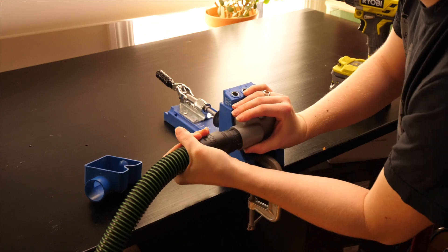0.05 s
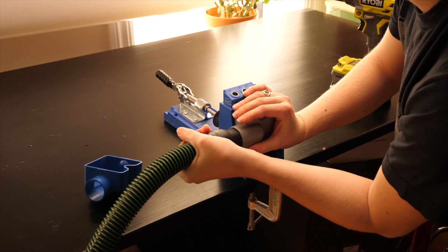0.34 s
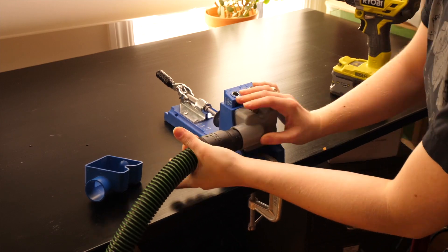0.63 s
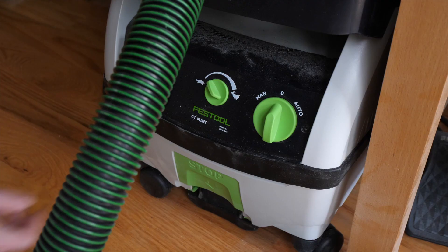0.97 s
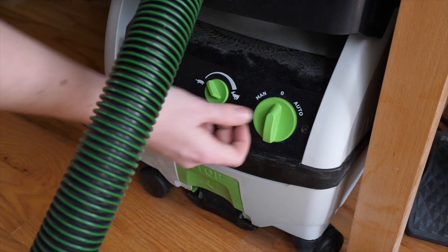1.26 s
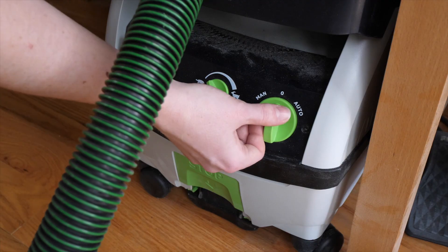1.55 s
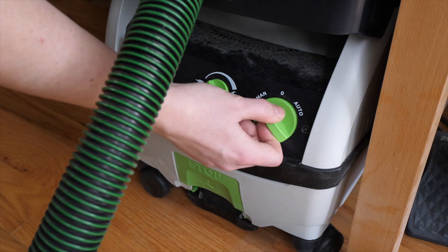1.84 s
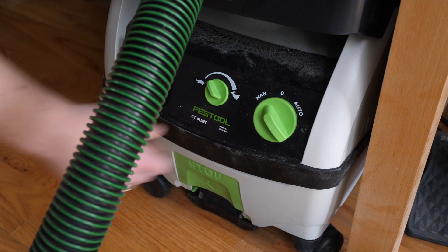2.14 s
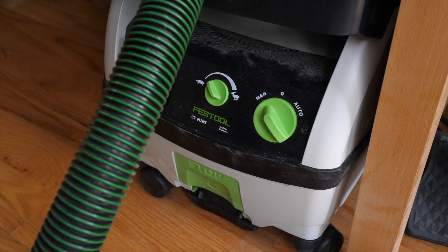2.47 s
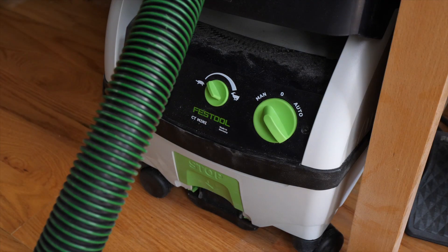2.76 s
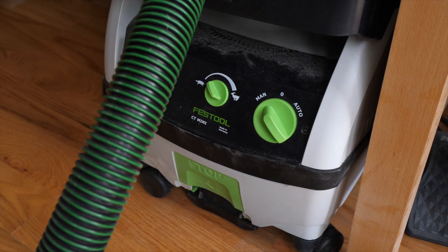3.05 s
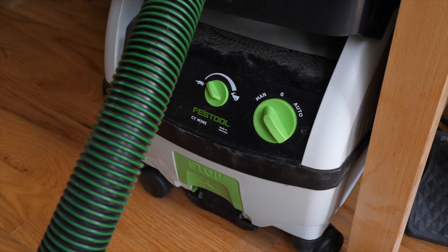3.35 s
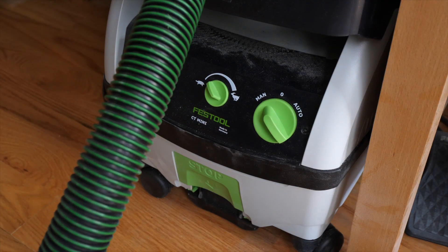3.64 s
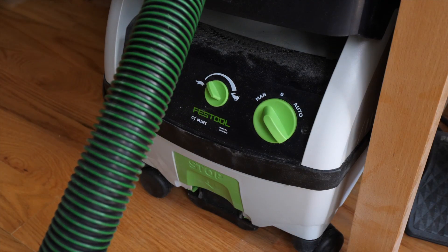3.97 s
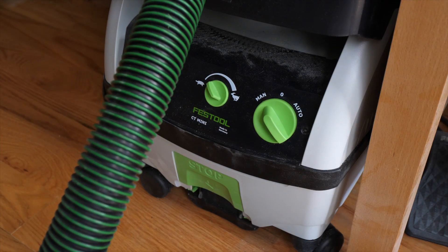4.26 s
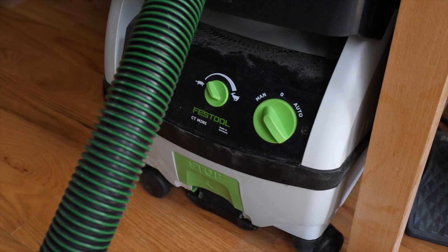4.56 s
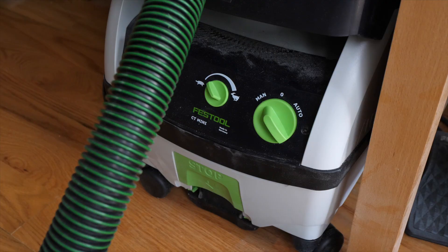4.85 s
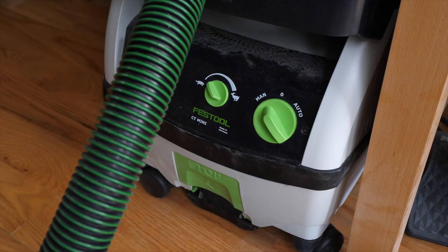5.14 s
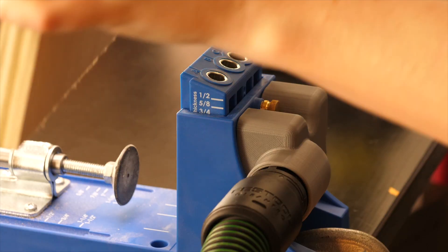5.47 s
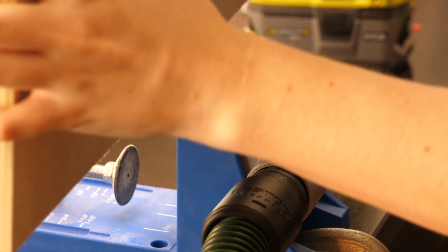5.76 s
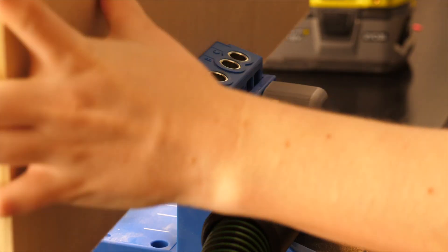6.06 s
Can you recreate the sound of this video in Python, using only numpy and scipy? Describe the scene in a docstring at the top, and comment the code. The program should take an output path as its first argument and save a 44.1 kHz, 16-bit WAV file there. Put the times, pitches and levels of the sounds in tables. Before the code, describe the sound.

A dust extractor clicks on in a workshop and spins up to roaring airflow, then a board scrapes briefly over close hose hiss.

```python
"""A small workshop with a dust extractor, in mono. Over a low background, fingers touch
the rotary switch; it snaps on, ringing its plastic panel and rattling the housing.
The motor hums on the mains and whines up to speed with brief whistles; its fan builds a
steady roar of air. Near the end the suction hiss at the hose inlet comes close,
and a board slides in a jig with short squeaky scrapes."""
import sys
import numpy as np
from scipy import signal
from scipy.fft import rfft, irfft, next_fast_len
from scipy.io import wavfile
from scipy.ndimage import map_coordinates

SR = 44100
rng = np.random.default_rng(int(sys.argv[2]) if len(sys.argv) > 2 else 0)


def unload_audio(sound):
    """Save the sound as a 16-bit wav file, at the path given as the first command line argument."""
    columns = np.transpose(np.atleast_2d(sound))
    # keep every value between -1 and 1, then stretch to whole-number steps
    steps = np.round(np.clip(columns, -1, 1) * 32767)
    wavfile.write(sys.argv[1], SR, steps.astype(np.int16))


N = 278271
TIME = np.arange(N) / SR
HUM_HZ = 120.1  # twice the mains frequency
FULL_SPEED_RPS = 552.6


def amp(db):
    """Decibels to gain."""
    return 10 ** (np.asarray(db) / 20)

def unit(x):
    """x at rms 1."""
    return x / np.sqrt(np.mean(x ** 2) + 1e-20)

def along(points, hz):
    """Interpolates (Hz, value) points on a log frequency axis."""
    f, v = np.transpose(points)
    return np.interp(np.log(hz + 1), np.log(f + 1), v)

def bumps(resonances, hz):
    """Boost in dB from resonances and notches."""
    return sum(db / (1 + (2 * (hz - centre) / width) ** 2) for centre, width, db in resonances)

def wobble(rate_hz):
    """Smooth random curve."""
    return map_coordinates(rng.standard_normal(int(N * rate_hz / SR) + 4), [TIME * rate_hz])

def filtered(x, response):
    """x through a gain given as a function of Hz."""
    size = next_fast_len(N + SR // 2)
    return irfft(rfft(x, size) * response(np.fft.rfftfreq(size, 1 / SR)), size)[:N]

def noise(spectrum, resonances=()):
    """Shaped noise at rms 1."""
    white = rng.standard_normal(N)
    return unit(filtered(white, lambda hz: amp(along(spectrum, hz) + bumps(resonances, hz))))

def decay(start_s, t60_s):
    """Instant attack, exponential fall."""
    return (TIME >= start_s) * amp(-60 * np.clip((TIME - start_s) / t60_s, 0, 10))

def ramp(start_s, length_s):
    """Linear rise from 0 to 1."""
    return np.clip((TIME - start_s) / length_s, 0, 1)


# Each row: frequency in Hz, relative noise density in dB.
FLOOR_SPECTRUM = [(12, -33), (20, -1.5), (123, -7.5), (181, -21), (239, -14), (268, -23.5), (364, -23.5),
                  (442, -30.5), (691, -34), (840, -37.5), (913, -34), (1050, -39.5), (1140, -40),
                  (2490, -43), (15700, -46)]

def room_floor():
    """Low background with a faint mains hum."""
    mains = amp(-57.5) * np.sin(np.pi * HUM_HZ * TIME)
    overtone = amp(-67) * np.sin(4 * np.pi * HUM_HZ * TIME + .5 * wobble(5.77))
    return amp(-54) * noise(FLOOR_SPECTRUM) + mains + overtone


# Each row: frequency in Hz, reverberation t60 in seconds.
ROOM_DECAY = [(150, 0.39), (1000, 0.75), (3500, 0.5), (6000, .25), (14000, 0.12)]

def workshop(x, wet_db):
    """Adds the room's reverberation; treble dies first."""
    hz, t, bins = signal.stft(rng.standard_normal(SR // 2), SR, nperseg=256)
    tail = signal.istft(bins * amp(-60 * t / along(ROOM_DECAY, hz)[:, None]), SR, nperseg=256)[1]
    tail *= 1 - np.exp(-np.arange(len(tail)) / SR / .0043)
    return x + amp(wet_db) * signal.fftconvolve(x, tail / np.linalg.norm(tail))[:N]


# Each row: start in seconds, level in dB, centre in Hz, half width in octaves, t60 in seconds.
KNOB_TOUCHES = [(1.337, -57, 1500, 1.5, 0.073), (1.38, -54.5, 1070, 1.75, 0.21),
                (1.382, -66, 4930, .05, 0.28), (1.425, -67, 10950, .5, .12),
                (1.634, -50, 1620, 0.95, 0.059), (2.068, -51, 3980, .1, 0.079),
                (2.072, -60, 5000, 0.39, 0.11)]

def touches():
    """Fingers tap and brush the knob: short noise bursts."""
    out = np.zeros(N)
    for start_s, db, centre_hz, octaves, t60_s in KNOB_TOUCHES:
        band = lambda hz: 1 / (1 + (np.log2((hz + 1) / centre_hz) / octaves) ** 4)
        out += amp(db) * decay(start_s, t60_s) * unit(filtered(rng.standard_normal(N), band))
    return workshop(out, wet_db=-8.5)


# The switch slips its detent, hits its stop, rebounds.
# Each row: start in seconds, relative ring level in dB, crack level in dB.
SWITCH_CONTACTS = [(1.7925, -41, -32), (1.7961, -13.5, -18), (1.8007, -34, -27), (1.8049, -19.5, -43)]
# Each row: frequency in Hz, relative level in dB, t60 in seconds.
PANEL_MODES = [(522, -6.5, 0.05), (910, -22, .09), (1183, -5.5, 0.083), (1233, -13, 0.1), (1400, -4, 0.027),
               (1730, -9, 0.05), (1940, 0, 0.052), (2090, 4, 0.023), (2350, -1, 0.021), (2580, 0, 0.026),
               (2900, 0, .02), (3160, -3, .04), (3660, -10, 0.026)]
# Each row: frequency in Hz, relative noise density in dB.
CLATTER_SPECTRUM = [(100, -17), (350, -16.5), (550, -6.5), (850, -8.5), (1200, -4.5), (1500, -4),
                    (2000, -6), (2700, -9.5), (3400, -5.5), (4300, -16.5), (5500, -28), (9000, -38),
                    (15000, -55)]

def switch():
    """Contacts crack and ring the plastic panel; the main blow thrusts air and rattles the housing."""
    out = np.zeros(N)
    t = TIME[:SR // 4]
    crack_spectrum = [(100, -17), (2000, 2), (5000, 8), (7300, 5), (9000, -3), (15000, -1)]  # Hz, dB
    for start_s, ring_db, crack_db in SWITCH_CONTACTS:
        ring = sum(amp(db - 60 * t / t60_s) * np.sin(2 * np.pi * (hz * t + rng.random()))
                   for hz, db, t60_s in PANEL_MODES)
        out[round(start_s * SR):][:len(t)] += amp(ring_db - 4.5) * ring * (1 - np.exp(-t / .0005))
        out += amp(crack_db) * decay(start_s, t60_s=.013) * noise(crack_spectrum)
    blow_s = SWITCH_CONTACTS[1][0]
    attack = 1 - np.exp(-np.abs(TIME - blow_s) / .0001)
    thrust = .4 * attack * decay(blow_s, t60_s=.006) * np.sin(2 * np.pi * 2400 * (TIME - blow_s))
    clatter_envelope = amp(-18) * decay(blow_s, t60_s=.06) + amp(-30.5) * decay(blow_s, t60_s=.5)
    return workshop(out + thrust, wet_db=-26) + clatter_envelope * noise(CLATTER_SPECTRUM)


def shaft_speed(start_s=1.845, time_constant_s=.985, softness=1.63):
    """Turns per second: a soft start, then air drag levels the speed off."""
    elapsed = np.maximum(TIME - start_s, 0) / time_constant_s
    return FULL_SPEED_RPS * (1 - np.exp(-elapsed ** softness))

def growth_db(speed_rps, full_db, range_db, bend):
    """Level climbs by range_db from standstill to full speed; bend above 1 flattens it early."""
    return full_db - range_db * np.abs(1 - speed_rps / FULL_SPEED_RPS) ** bend


# Each row: multiple of HUM_HZ, relative level in dB at standstill, the same at full speed.
HUM_HARMONICS = [(1, -1.5, 1.5), (2, -5, -22), (3, -28.5, -33), (4, -27, -21), (5, -23.5, -44),
                 (6, -36, -55), (7, -25, -44), (8, -32.5, -28), (10, -31, -47)]

def hum(speed_rps, inlet_near, base_db=-30.5, surge_db=4.5, away_db=1.5):
    """The field pulls twice a mains cycle, hardest under load; most overtones fade with the current."""
    run_up = speed_rps / FULL_SPEED_RPS
    load = run_up ** 2.2 * (1 - run_up)  # peaks late in the run-up
    level_db = base_db + surge_db * load / load.max() - away_db * inlet_near
    phase = 2 * np.pi * HUM_HZ * TIME + .022 * wobble(17)
    tones = np.zeros(N)
    for multiple, still_db, full_db in HUM_HARMONICS:
        gain = amp(still_db + (full_db - still_db) * run_up ** 2)
        tones += gain * np.sin(multiple * phase + rng.uniform(0, 2 * np.pi))
    return amp(level_db + .51 * wobble(7)) * np.sqrt(2) * tones


# Each row: centre in Hz, width in Hz, boost in dB (negative: a notch).
MOUNT_RESONANCES = [(206, 25, 16), (266, 49, -13), (318, 25, 13), (357, 51, 9.5)]
# Fan blade and commutator tones. Each row: multiple of shaft speed, peak level in dB,
# loudest speed in turns per second, spread in turns per second, phase blur rate in Hz.
SHAFT_TONES = [(2, -41, 525, 55, 5), (2, -44, 426, 40, 28), (7, -38.5, 424, 5.9, 14),
               (14, -57, 172, 17, 40), (14, -55, 265, 31, 76), (14, -47, 307, 10, 25),
               (22, -60, 140, 30, 190), (22, -64.5, 208, 17, 200)]

def whine(speed_rps):
    """Shaft tones glide up and swell at mount and housing resonances; turbulence blurs their phase."""
    angle = 2 * np.pi * np.cumsum(speed_rps) / SR
    unbalance_db = growth_db(speed_rps, full_db=-32.5, range_db=26, bend=.98)
    unbalance_db += bumps(MOUNT_RESONANCES, speed_rps)
    out = amp(unbalance_db + .3 * wobble(8)) * np.sin(angle + .084 * wobble(21))
    for multiple, db, peak_rps, spread_rps, blur_hz in SHAFT_TONES:
        swell = np.exp(-.5 * ((speed_rps - peak_rps) / spread_rps) ** 2) * amp(db + wobble(22))
        out += swell * np.sin(multiple * angle + 2.36 * wobble(blur_hz))
    return np.sqrt(2) * out


def pipe(x, echo_db, count=24):
    """Weak reflections in hose and housing comb the hiss; output at rms 1."""
    delays_s = rng.uniform(.008, .04, count)
    echoes = sum(rng.choice([-1, 1]) * np.pad(x, (round(s * SR), 0))[:N] for s in delays_s)
    return unit(x + amp(echo_db) * echoes / np.sqrt(count))


# Housing and hose. Each row: centre in Hz, width in Hz, boost in dB (negative: a notch).
DUCT_RESONANCES = [(212.4, 43, 7.5), (264, 41, 6), (441, 58, 2.5), (736, 70, 5.5), (817, 15, 3),
                   (1460, 61, 6.5), (2038, 130, 5), (2450, 300, 2.5), (2810, 150, 2.5), (3445, 110, 6),
                   (4540, 17, 8), (4730, 44, 7), (5030, 47, 9), (5210, 99, 2), (4600, 54, -9),
                   (4920, 90, -2), (5680, 320, 4.5), (6210, 130, 6.5), (7430, 250, 1), (9080, 500, 4.5),
                   (11800, 400, -5), (12070, 300, 6.5), (15450, 150, 2)]
# Four bands of air noise. Each row: frequency in Hz, relative noise density in dB.
RUMBLE_SPECTRUM = [(25, -36), (50, -16.5), (85, -0.5), (130, 2), (230, -3), (320, 1), (400, -12),
                   (600, -11.5), (1000, -34), (2000, -92)]
ROAR_SPECTRUM = [(100, -36), (250, -16), (420, 2), (620, -2), (800, 0), (1050, -1.5), (1250, -9.5),
                 (1600, -20), (3000, -23), (8000, -95)]
RUSH_SPECTRUM = [(500, -17), (1200, -2.5), (1700, -1.5), (2200, 0), (3300, 2), (4000, -1.5), (4700, -5),
                 (6000, -31), (8000, -20), (16000, -54)]
FIZZ_SPECTRUM = [(2000, -33), (4000, 3.5), (5400, 3), (6300, 2.5), (7300, 1.5), (8300, -6), (9800, -3.5),
                 (11500, -6), (13000, -9.5), (15700, -13)]

def airflow(speed_rps):
    """Turbulence in the ducts: low buffeting first, fizz last as the fan gathers speed."""
    rumble_db = growth_db(speed_rps, full_db=-30.5, range_db=20.3, bend=1.2)
    roar_db = growth_db(speed_rps, full_db=-29, range_db=26.2, bend=1.08)
    rush_db = growth_db(speed_rps, full_db=-33.5, range_db=49, bend=1.95)
    fizz_db = growth_db(speed_rps, full_db=-36.5, range_db=64, bend=1.29)
    rumble = amp(rumble_db + .69 * wobble(12)) * noise(RUMBLE_SPECTRUM, DUCT_RESONANCES)
    roar = amp(roar_db + .32 * wobble(19)) * noise(ROAR_SPECTRUM, DUCT_RESONANCES)
    rush = amp(rush_db + .38 * wobble(18)) * pipe(noise(RUSH_SPECTRUM, DUCT_RESONANCES), echo_db=-13)
    fizz = amp(fizz_db) * pipe(noise(FIZZ_SPECTRUM, DUCT_RESONANCES), echo_db=-9.5)
    return rumble + roar + rush + fizz


# Three whistles, then three scrapes.
# Each row: peak time in seconds, half length in seconds, centre in Hz, width in Hz, level in dB.
WHISTLES_AND_SCRAPES = [(2.22, 0.13, 1400, 200, -62), (2.394, 0.052, 1410, 160.6, -52),
                        (2.73, 0.23, 2076, 280, -46), (6.235, 0.038, 2440, 802, -28.5),
                        (6.263, .05, 3950, 1100, -32.5), (6.282, 0.044, 7000, 900, -35)]

def whistles_and_scrapes():
    """Brief narrow noise bands: whistles as the fan speeds up, then a board scraping in a jig."""
    out = np.zeros(N)
    for peak_s, half_s, hz, width_hz, db in WHISTLES_AND_SCRAPES:
        phase = 2 * np.pi * hz * TIME
        band = unit(wobble(width_hz) * np.sin(phase) + wobble(width_hz) * np.cos(phase))
        out += amp(db) * np.exp(-((TIME - peak_s) / half_s) ** 2) * band
    return out


# Each row: frequency in Hz, relative noise density in dB.
SUCTION_SPECTRUM = [(250, -19), (700, -0.5), (1300, -0.5), (2500, -2), (3800, 0), (4500, -7), (5400, -2.5),
                    (6200, -15.5), (8000, -16), (10000, -16.5), (13000, -23), (15700, -28)]

def inlet(inlet_near, close_db=-26):
    """Air hisses past the edges of the hose inlet."""
    return inlet_near * amp(close_db + .3 * wobble(20)) * pipe(noise(SUCTION_SPECTRUM), echo_db=-5.5)


def scene():
    """The motor gets power just after the snap; its speed drives hum, whine and airflow."""
    speed_rps = shaft_speed()
    power = ramp(start_s=1.975, length_s=.035)
    inlet_near = ramp(start_s=5.357, length_s=.44)
    motor = power * (hum(speed_rps, inlet_near) + whine(speed_rps) + airflow(speed_rps))
    mono = room_floor() + touches() + switch() + motor + inlet(inlet_near) + whistles_and_scrapes()
    return np.array([mono, mono])

def record(dry, cutoff_hz=15750):
    """Brick-wall low-pass."""
    return np.array([filtered(channel, lambda hz: hz < cutoff_hz) for channel in dry])


dry = scene()
out = record(dry)
unload_audio(out)
```